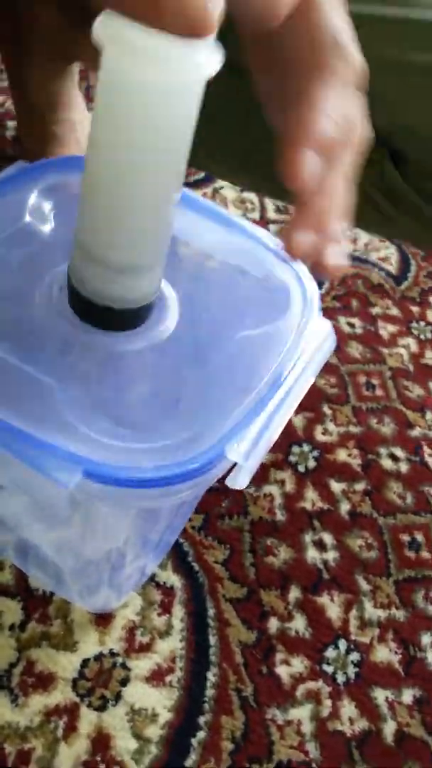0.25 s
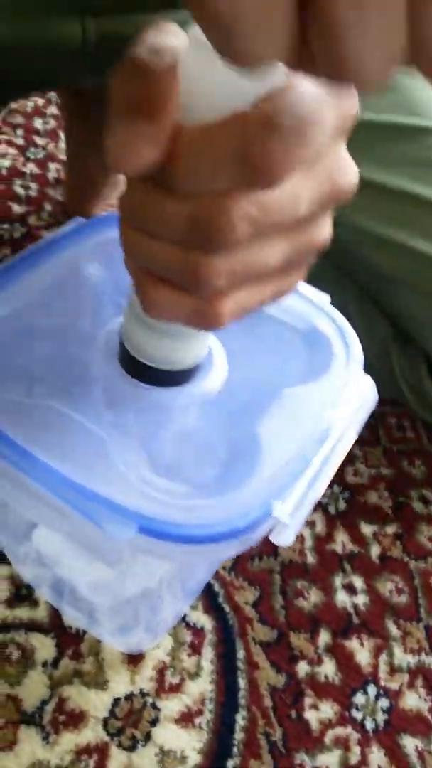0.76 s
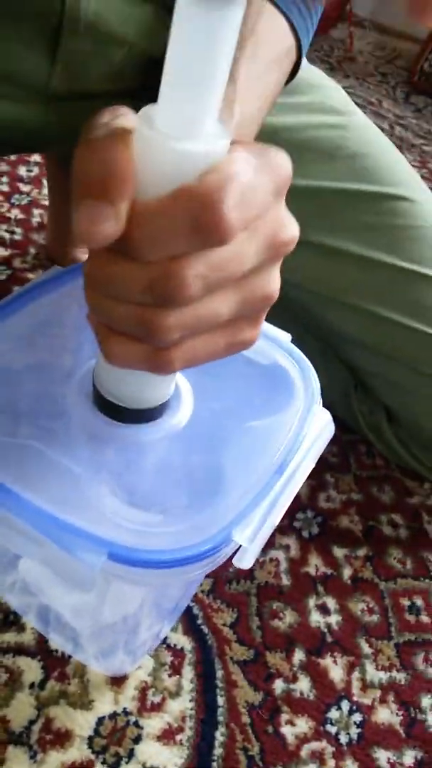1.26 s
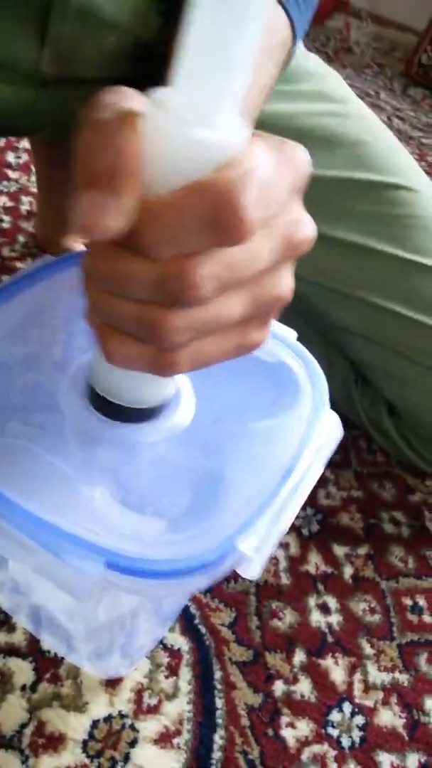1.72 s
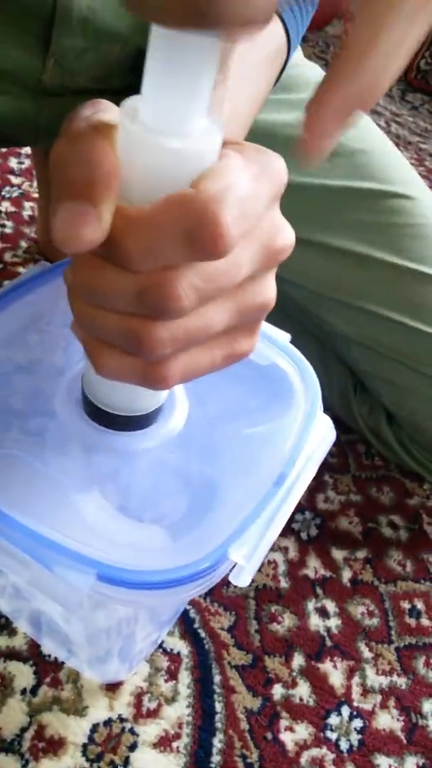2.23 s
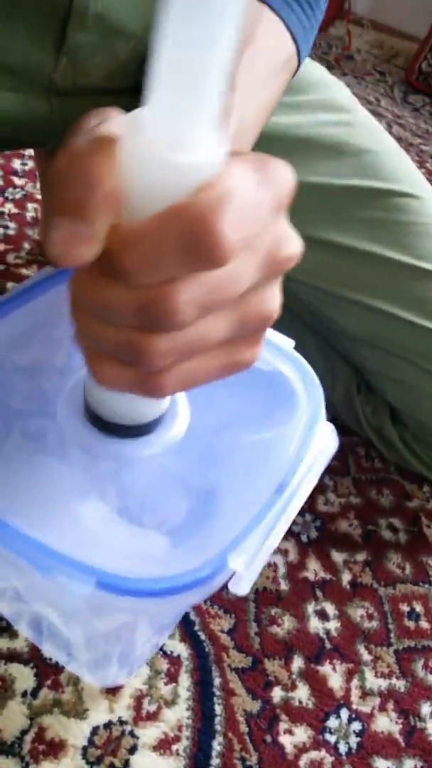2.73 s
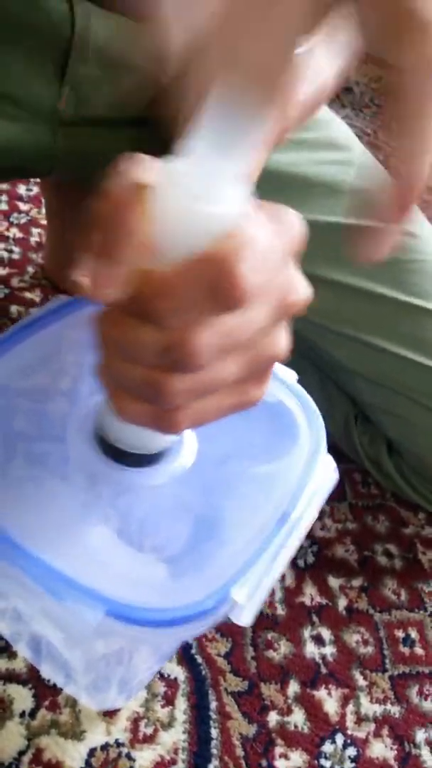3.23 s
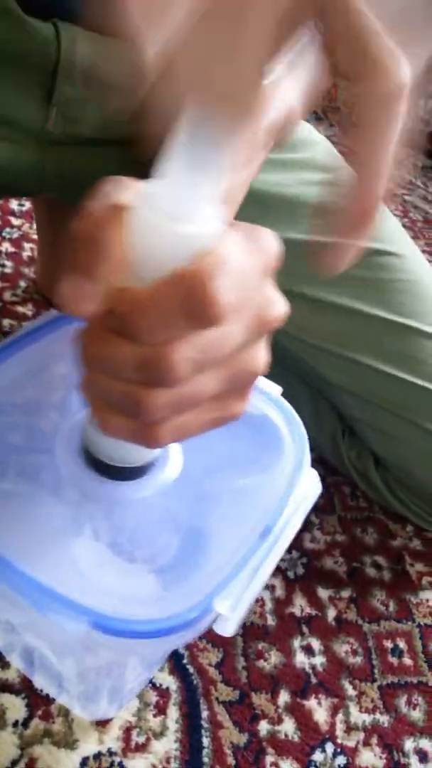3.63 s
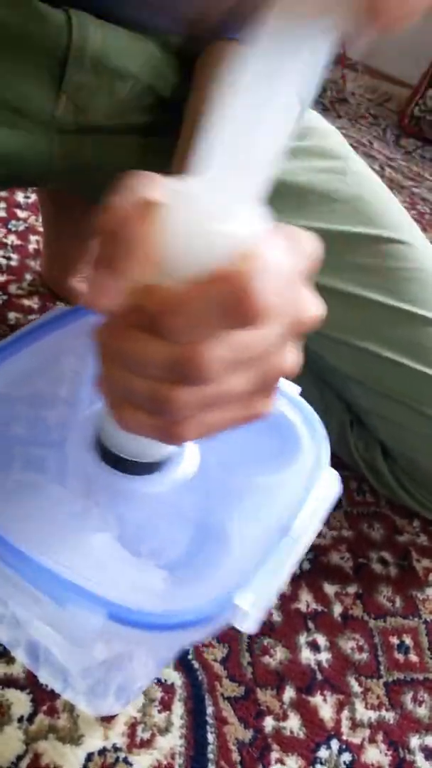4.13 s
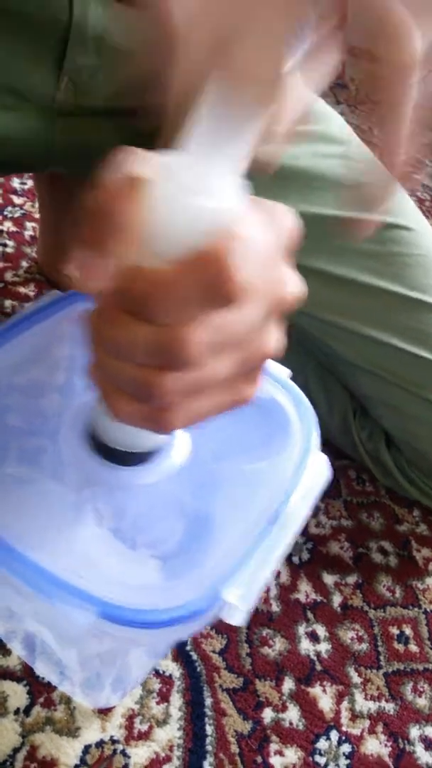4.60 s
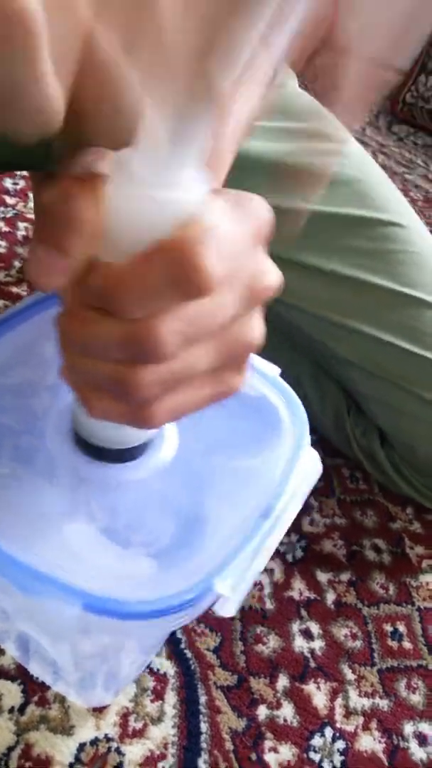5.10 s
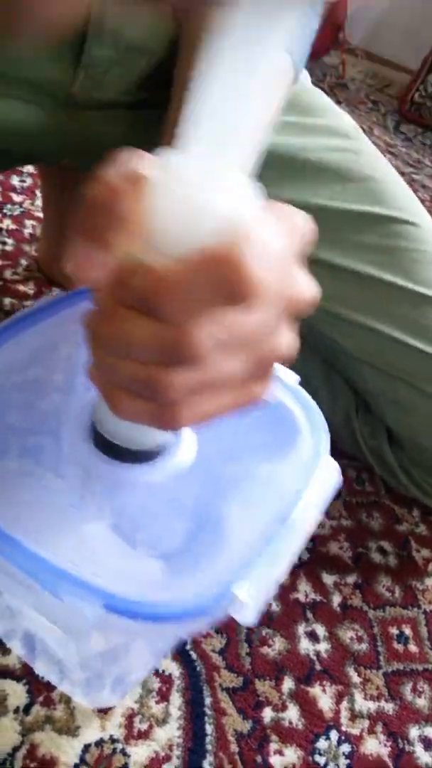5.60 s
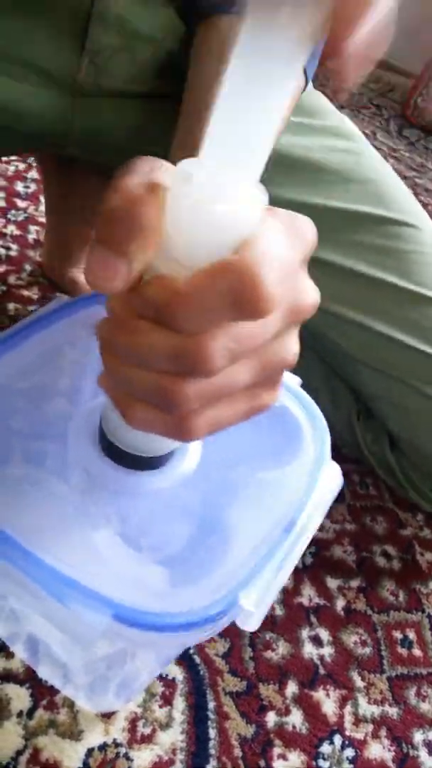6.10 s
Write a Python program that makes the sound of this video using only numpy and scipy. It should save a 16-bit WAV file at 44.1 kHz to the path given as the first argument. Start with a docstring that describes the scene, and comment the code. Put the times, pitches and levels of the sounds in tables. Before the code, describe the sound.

After a knock and soft hand rubbing, a few gentle pump strokes pause, then speed into fast wheezing puffs with hard hollow plastic knocks.

```python
"""Small room, carpet: a plastic hand pump draws air from a food box, at its fastest about five strokes a second.
Pushes and pulls are shaped noise: a hiss out, a softer one in, swept by the air column in the barrel.
The seal puffs at the top, the column whistles upward on slow pulls and the valve hoots; hands rub and bump.
Each turn taps and thumps the box; end-stop knocks are damped modes plus a noise crack."""
import sys
import numpy as np
from scipy import signal
from scipy.fft import rfft, irfft, next_fast_len
from scipy.io import wavfile
from scipy.ndimage import map_coordinates

SR = 44100
rng = np.random.default_rng(int(sys.argv[2]) if len(sys.argv) > 2 else 0)


def wrap_up_sound(samples):
    """Save the sound to the file named by the first command line argument, as 16-bit audio."""
    columns = np.atleast_2d(samples).T
    # keep every value between -1 and 1, then stretch to whole-number steps
    tamed = np.clip(columns, -1, 1)
    steps = np.round(tamed * 32767).astype(np.int16)
    wavfile.write(sys.argv[1], SR, steps)


N = 280198

# pump strokes: top_s (piston leaves the top), bottom_s, effort_db (relative hiss), snap_db (relative seal snap)
STROKE_ROWS = [(1.08, 1.187, -29, -42.5), (1.341, 1.461, -34, -48.5), (1.587, 1.695, -33.5, -46.5),
               (1.814, 1.921, -36, -33.5), (2.544, 2.652, -26.5, -29), (2.779, 2.88, -27, -28.5),
               (2.99, 3.085, -28.5, -24.5), (3.195, 3.298, -28, -31), (3.396, 3.495, -23.5, -25.5),
               (3.602, 3.696, -28, -28.5), (3.799, 3.892, -21.5, -26), (4.005, 4.101, -25.5, -26.5),
               (4.197, 4.287, -26, -26.5), (4.382, 4.474, -25.5, -24.5), (4.575, 4.658, -24.5, -24),
               (4.755, 4.84, -22.5, -25), (4.95, 5.036, -24, -21), (5.126, 5.217, -23, -16),
               (5.305, 5.394, -25, -17), (5.49, 5.576, -23.5, -18.5), (5.665, 5.747, -24.5, -24),
               (5.848, 5.933, -27.5, -23), (6.032, 6.122, -25.5, -25.5), (6.212, 6.296, -26.5, -32.5)]
# outgoing air spectrum: freq_hz, density_db (relative)
OUTLET_SPECTRUM = [(100, -10), (250, 0.5), (450, 4), (700, -1), (1080, 11.5), (1500, -4), (2400, 0.5),
                   (3500, -5), (5500, -5.5), (8000, -6), (11000, -5.5), (14500, -10.5)]
USUAL_DB = -26  # reference for effort and snap


def amp(db):
    """Decibels to gain."""
    return 10 ** (np.asarray(db) / 20)


def unit(x):
    """Scale to rms 1."""
    return x / np.sqrt(np.mean(x ** 2) + 1e-20)


def along(points, hz):
    """Interpolate (Hz, value) points on a log frequency axis."""
    point_hz, values = np.transpose(points)
    return np.interp(np.log(hz + 1), np.log(point_hz + 1), values)


def clock(seconds):
    """Sample times from zero, in s."""
    return np.arange(max(int(seconds * SR), 2)) / SR


def add(track, start_s, sound):
    """Mix a sound into the track at start_s."""
    i = max(round(start_s * SR), 0)
    part = track[i:i + len(sound)]
    part += sound[:len(part)]


def wobble(rate_hz, size):
    """Smooth random curve with rate_hz knots a second."""
    knots = rng.standard_normal(int(size * rate_hz / SR) + 4)
    return map_coordinates(knots, [np.arange(size) * rate_hz / SR])


def filtered(x, response):
    """Apply a gain that is a function of frequency."""
    m = next_fast_len(len(x) + 8192)
    gain = response(np.fft.rfftfreq(m, 1 / SR))
    return irfft(rfft(x, m) * gain, m)[:len(x)]


def noise(spectrum, size):
    """Gaussian noise of rms 1 with a given spectrum."""
    return unit(filtered(rng.standard_normal(size), lambda hz: amp(along(spectrum, hz))))


def narrow(hz, width_hz):
    """Narrowband noise of rms 1: random quadrature envelopes on a carrier that follows hz."""
    phase = 2 * np.pi * np.cumsum(hz) / SR
    in_phase = wobble(width_hz, len(hz)) * np.cos(phase)
    quadrature = wobble(width_hz, len(hz)) * np.sin(phase)
    return unit(in_phase + quadrature)


def column_whistle(pitches_hz, seconds, width_hz):
    """Airy tone that swells and fades while gliding through evenly spaced pitches."""
    n = len(clock(seconds))
    hz = np.interp(np.linspace(0, 1, n), np.linspace(0, 1, len(pitches_hz)), pitches_hz)
    return np.sqrt(np.hanning(n)) * narrow(hz, width_hz)


def swing(modes, t, detune):
    """Damped modes that swell and die within a few cycles, all detuned by one ratio."""
    total = 0
    for hz, db, rise_s, steepness in modes:
        u = t / rise_s
        swell = (u * np.exp(1 - u)) ** steepness
        total = total + amp(db) * swell * np.sin(2 * np.pi * hz * (1 + detune) * t)
    return total


def airflow(spectrum, size, column_from_hz, column_to_hz, bend):
    """Turbulence of rms 1 in the barrel: the moving piston sweeps the column's comb and bends the resonances."""
    # air passage resonances: centre_hz, width_hz, peak_db
    passage_modes = [(2650, 1800, 0.5), (4277, 460, 10.5), (5383, 220, 12.5), (6510, 610, 8)]
    hz, t, z = signal.stft(rng.standard_normal(size + 384), SR, nperseg=384, noverlap=288)
    hz, travel = hz[:, None], np.linspace(0, 1, len(t))
    reach = 1 + 0.027 * rng.standard_normal()  # no two strokes are equally long
    column_hz = reach * column_from_hz * (column_to_hz / column_from_hz) ** (travel ** 0.72)
    # sound runs to the piston and back; overtones lie a little flat, treble reflects less
    round_trip = np.maximum(hz / column_hz, .5) ** 1.13
    reflection = .7 * np.exp(-hz / 17000)
    column = 1 / np.abs(1 - reflection * np.exp(2j * np.pi * round_trip))
    shift = reach * (1 + bend * (travel - .5))
    passage_db = 0
    for centre_hz, width_hz, peak_db in passage_modes:
        passage_db = passage_db + peak_db / (1 + (2 * (hz - centre_hz * shift) / width_hz) ** 2)
    shaped = z * column * amp(along(spectrum, hz) + passage_db)
    return unit(signal.istft(shaped, SR, nperseg=384, noverlap=288)[1][:size])


def pull_spans():
    """(start_s, end_s, level_db) of upward travels: until the next push, or at leisure beside a rest."""
    rest_s, first_pull_s, last_pull_s = .3, .155, .11
    base_db, follows_snap, leisure_db = -43, 0.71, -2.5  # a hard pull ends in a hard snap
    spans, last_bottom_s = [], -np.inf
    for top_s, bottom_s, _, snap_db in STROKE_ROWS:
        db = base_db + follows_snap * max(snap_db - USUAL_DB, 0)
        if top_s - last_bottom_s > rest_s:
            spans.append((top_s - first_pull_s, top_s, db + leisure_db))
        else:
            spans.append((last_bottom_s, top_s, db))
        if not any(bottom_s < row[0] < bottom_s + rest_s for row in STROKE_ROWS):
            spans.append((bottom_s, bottom_s + last_pull_s, db + leisure_db))
        last_bottom_s = bottom_s
    return spans


def room_tone():
    """Steady noise of the still room."""
    # still room spectrum: freq_hz, density_db (relative)
    quiet_spectrum = [(15, -46), (25, -18.5), (111, -7.5), (189, -12.5), (1250, -30), (9470, -36.5),
                      (10500, -35.5), (14500, -36)]
    return amp(-57) * noise(quiet_spectrum, N)


def room(x):
    """Diffuse reflections as decaying noise, drawn afresh every 1/4 s."""
    # decay time: freq_hz, t60_s
    t60_points = [(150, 0.46), (450, 0.23), (1000, 0.39), (4000, 0.47), (12000, 0.67)]
    # tail colour: freq_hz, level_db (relative)
    colour_points = [(150, 3), (450, -1), (700, 11), (1050, -2.5), (4000, -2), (12000, -3.5)]
    out, hop = np.zeros(N), SR // 4
    for i in range(0, N, hop):
        hz, t, z = signal.stft(rng.standard_normal(SR // 2), SR, nperseg=256)
        decay_db = along(colour_points, hz)[:, None] - 60 * t / along(t60_points, hz)[:, None]
        tail = signal.istft(z * amp(decay_db), SR, nperseg=256)[1]
        tail = tail / np.linalg.norm(tail)
        add(out, i / SR + 0.0087, signal.fftconvolve(x[i:i + hop], tail))
    return out


def handling():
    """Skin rubbing on the barrel murmurs through the box as the hands shift."""
    # rubbing level: time_s, level_db (relative)
    rub_levels = [(0, -51.5), (.24, -49.5), (.45, -61.5), (.58, -70), (.68, -50), (.85, -62), (1.0, -51),
                  (1.95, -52.5), (2.15, -71.5), (2.4, -52.5), (2.8, -45.5)]
    # skin on plastic spectrum: freq_hz, density_db (relative)
    rub_spectrum = [(40, -48), (120, -21), (230, -8), (320, -11.5), (440, 3.5), (620, -26), (1000, -11),
                    (1500, -20.5), (4500, -25.5), (14000, -40)]
    level_db = np.interp(np.arange(N) / SR, *np.transpose(rub_levels))
    return amp(level_db + 1.5 + 3.8 * wobble(30, N)) * noise(rub_spectrum, N)


def whistles():
    """The inlet valve hoots; the barrel's air column whistles upward on slow pulls, faintly as the piston creeps."""
    # valve hoots: centre_s, level_db
    hoot_rows = [(2.95, -30), (3.352, -28), (3.56, -27.5), (4.54, -25.5), (4.72, -28), (5.103, -26),
                 (5.456, -29.5), (5.819, -29.5), (5.992, -28)]
    # piston creeps as the hand takes hold: time_s (only first and last used), pitch_hz
    creep_points = [(.49, 2730), (.61, 3420), (.74, 3250)]
    hoot_s, hoot_hz, slow_pull_s = .028, 1047, .115
    out, t = np.zeros(N), clock(hoot_s)
    for (centre_s, db), detune in zip(hoot_rows, rng.normal(0, 0.011, len(hoot_rows))):
        hz = hoot_hz * (1 + detune + 0.031 * wobble(223, len(t)))
        tone = np.sin(2 * np.pi * np.cumsum(hz) / SR)
        add(out, centre_s - hoot_s / 2, amp(db) * np.hanning(len(t)) * tone)
    for start_s, end_s, _ in pull_spans():
        half_s = (end_s - start_s) / 2
        if end_s - start_s > slow_pull_s:
            add(out, start_s + half_s, amp(-52) * column_whistle([3850, 4500], half_s, width_hz=330))
    times_s, pitches_hz = np.transpose(creep_points)
    creep = column_whistle(pitches_hz, times_s[-1] - times_s[0], width_hz=127)
    add(out, times_s[0], amp(-66) * creep)
    return out


def flips():
    """The seal turns over with a puff at the top; each change of load thumps the box on the carpet."""
    # arm's jolt at the top of a stroke: time_s, thump_db
    jolt_points = [(1.8, -37), (3.2, -38), (4.0, -38), (4.2, -27), (5.65, -29.5), (6.2, -38)]
    thump_modes = [(174, 0, 0.0027, 1.35)]  # pitch_hz, level_db, rise_s, steepness
    out, t = np.zeros(N), clock(0.054)
    u = t / 0.0025
    puff = u * np.exp(1 - u)
    detunes = rng.normal(0, 0.17, (len(STROKE_ROWS), 2))
    for (top_s, bottom_s, _, snap_db), (top_detune, bottom_detune) in zip(STROKE_ROWS, detunes):
        air = airflow(OUTLET_SPECTRUM, len(t), column_from_hz=6640, column_to_hz=4510, bend=0)
        add(out, top_s, amp(snap_db - 8.0) * puff * air)
        jolt_db = np.interp(top_s, *np.transpose(jolt_points))
        add(out, top_s, amp(jolt_db) * swing(thump_modes, t, top_detune))
        add(out, bottom_s, amp(-40.5) * swing(thump_modes, t, bottom_detune))
    return out


def pulls():
    """Air is drawn from the box; the column shortens and rises in pitch."""
    # incoming air spectrum: freq_hz, density_db (relative)
    inlet_spectrum = [(100, -10), (250, -1), (450, 10.5), (700, -1), (1060, 16), (1500, 2), (2600, 0),
                      (4300, -7), (6500, -9.5), (8000, -9), (14500, -14.5)]
    rise_share, fall_share = 0.23, 0.37  # of the pull's length
    out = np.zeros(N)
    for start_s, end_s, db in pull_spans():
        n = len(clock(end_s - start_s))
        flow = np.interp(np.linspace(0, 1, n), [0, rise_share, 1 - fall_share, 1], [0, 1, 1, 0.12])
        air = airflow(inlet_spectrum, n, column_from_hz=1970, column_to_hz=4270, bend=0.1)
        add(out, start_s, amp(db + 2.3 * wobble(88.0, n)) * flow * air)
    return out


def pushes():
    """Air hisses out, swelling late and stopping fast; the column lengthens and falls in pitch."""
    dwell_s, dwell_s_per_db = .012, .002  # wait at the top, longer for a gentle stroke
    skew, sharpness, gain_db = 1.3, 1, -2
    out = np.zeros(N)
    for top_s, bottom_s, effort_db, _ in STROKE_ROWS:
        start_s = top_s + max(dwell_s + dwell_s_per_db * (USUAL_DB - effort_db), 0)
        n = len(clock(bottom_s - start_s))
        flow = np.abs(np.sin(np.pi * np.linspace(0, 1, n) ** skew)) ** sharpness
        unsteady = amp(1.1 * wobble(150, n))
        air = airflow(OUTLET_SPECTRUM, n, column_from_hz=5270, column_to_hz=1933, bend=-0.059)
        add(out, start_s, amp(effort_db + gain_db) * unsteady * flow * air)
    return out


def blow(lid_db, crack_db):
    """One contact: the plastic cracks, the lid rings at once and the air in the box follows."""
    # box air modes: pitch_hz, level_db, rise_s, steepness
    box_modes = [(240, -17, 0.0029, 1.1), (447.8, -1, 0.0042, 1.94)]
    # lid modes: pitch_hz, level_db (before lid_db), rise_s, steepness
    lid_modes = [(912, -5.5, 0.0009, 0.44), (1032, -0.5, 0.0022, 1)]
    # cracking plastic spectrum: freq_hz, density_db (relative)
    crack_spectrum = [(200, -19.5), (1200, 0.5), (2200, -7), (2900, 0), (3700, -2.5), (5500, -10),
                      (8000, -19.5), (14000, -46.5)]
    t = clock(0.0383)
    box_detune, lid_detune = rng.normal(0, 0.014, 2)
    ring = swing(box_modes, t, box_detune) + amp(lid_db) * swing(lid_modes, t, lid_detune)
    cushion = signal.butter(6, 1340, fs=SR, output="sos")  # the rubber foot softens the blow
    crack = amp(crack_db - 60 * t / 0.031) * noise(crack_spectrum, len(t))
    return crack - signal.sosfilt(cushion, ring)


def contacts():
    """End-stop knocks, light hand bumps, and a light tap at each piston turn, mostly the low ring of the box."""
    # end-stop knocks: start_s, level_db, lid_db, crack_db (both relative to the blow)
    knock_rows = [(0.265, -5.5, -9, -19.5), (1.1662, -4, 3.5, -12), (2.6305, -4.5, 5.5, -12.5),
                  (2.7463, -13.5, -4.5, -25), (3.159, -7.5, 5, -22.5), (3.3736, -12, 3, -23),
                  (3.582, -15, 1, -17.5), (3.7763, -10, 1, -20), (3.878, -6, 5.5, -10.5),
                  (3.9716, -5.5, 5, -18.5), (4.8245, -6, 4, -12.5), (5.0218, -8.5, 6, -24),
                  (5.2005, -10, 6, -24)]
    # hand bumps between bouts: start_s, level_db, lid_db, crack_db (all before the trims below)
    bump_rows = [(0.053, -33, -11, -10.5), (0.134, -37, -19, -22), (0.607, -41, -7, -19),
                 (0.644, -28.5, -20, -23.5), (0.785, -35, -8, -24), (2.066, -36, -17, -28),
                 (2.192, -41.5, -15, -20), (2.268, -41.5, -17, -21), (2.422, -32.5, -7, -16)]
    out = np.zeros(N)
    for start_s, db, lid_db, crack_db in knock_rows:
        add(out, start_s, amp(db) * blow(lid_db, crack_db))
    for start_s, db, lid_db, crack_db in bump_rows:
        add(out, start_s, amp(db + .5) * blow(lid_db + 3.0, crack_db + 2.5))
    turn_lid_db = rng.normal(-7, 3.6, (len(STROKE_ROWS), 2))
    for (top_s, bottom_s, _, _), (top_lid_db, bottom_lid_db) in zip(STROKE_ROWS, turn_lid_db):
        add(out, top_s + .005, amp(-34) * blow(top_lid_db, crack_db=-17.5))
        add(out, bottom_s, amp(-29.5) * blow(bottom_lid_db, crack_db=-13))
    return out


def scene():
    """Pump and box close by, in a quiet room."""
    air = pushes() + pulls() + whistles() + flips() + handling()
    hits = contacts()
    wet = room(amp(-11) * air + amp(-14.5) * hits)
    return (air + hits + wet + room_tone())[None]


def record(dry):
    """The microphone thins the bass, peaks beyond full scale clip, and nothing passes above the band limit."""
    bass_cut_hz, top_hz = 99, 14830
    high_pass = signal.butter(2, bass_cut_hz, "highpass", fs=SR, output="sos")
    thinned = signal.sosfilt(high_pass, dry[0])
    return filtered(np.clip(thinned, -1, 1), lambda hz: hz < top_hz)[None]


dry = scene()
out = record(dry)
wrap_up_sound(out)
```